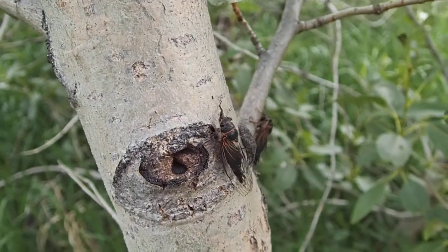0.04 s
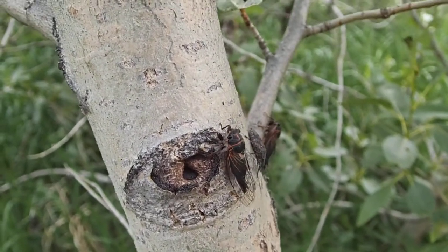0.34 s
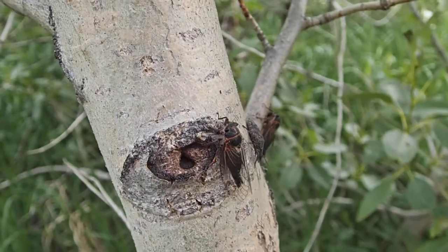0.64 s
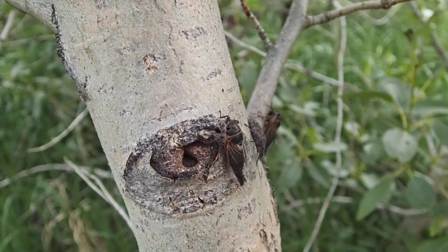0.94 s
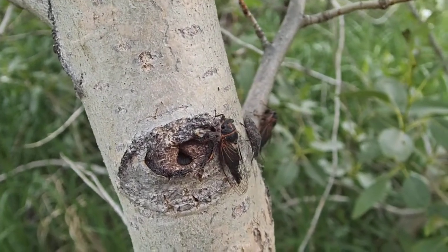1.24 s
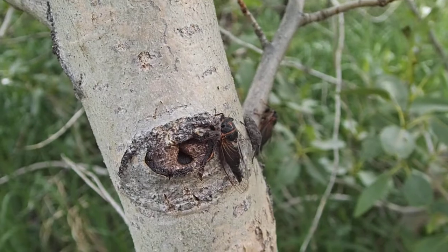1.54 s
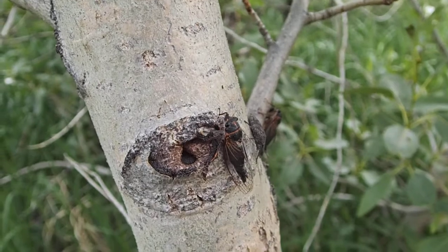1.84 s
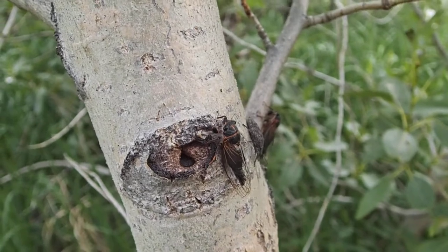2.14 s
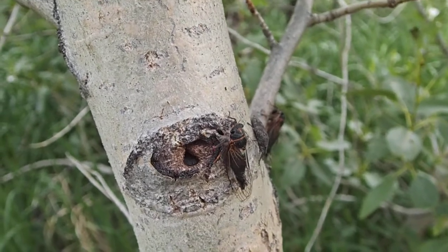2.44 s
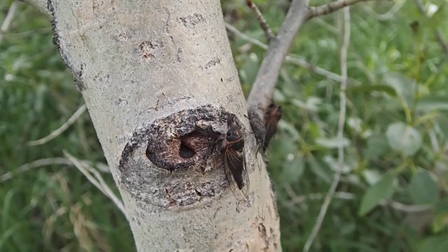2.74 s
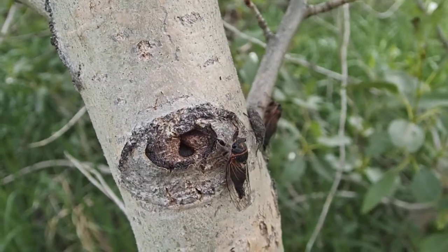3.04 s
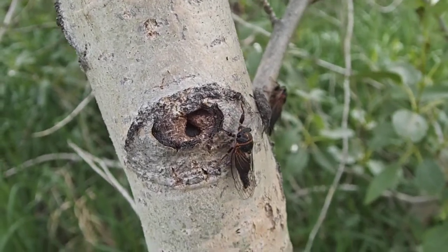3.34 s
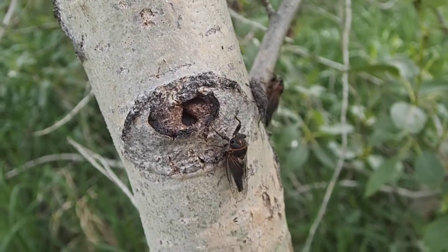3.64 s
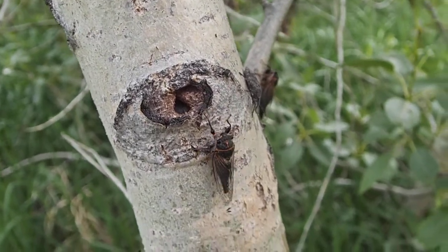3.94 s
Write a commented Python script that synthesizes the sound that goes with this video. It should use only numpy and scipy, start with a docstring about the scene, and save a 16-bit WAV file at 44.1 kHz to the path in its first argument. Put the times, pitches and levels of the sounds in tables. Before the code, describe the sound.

Sharp cicada wing clicks sound close and slightly left, growing harder, then turning to dry snaps. Other cicadas click over a faint outdoor hiss and rumble, and a camera's focus motor rattles softly until just past halfway.

```python
"""Outdoors at a tree trunk among bushes, on a camera's stereo microphone. Close up and a little right, a cicada
flicks its wings about seven times a second, each flick buckling and ringing the membrane; for a second it slaps
them hard, then snaps them dryly. Neighbours click in answer, and leaves scatter the clicks. Far off, air
rumbles softly and the colony hisses. On the right a small mechanism, probably the focus motor, chatters until
it stops with a tick. Two soft handling bumps reach the microphone."""
import sys
import numpy as np
from scipy import signal
from scipy.fft import rfft, irfft
from scipy.io import wavfile
from scipy.ndimage import map_coordinates

SR = 44100
rng = np.random.default_rng(int(sys.argv[2]) if len(sys.argv) > 2 else 0)


def int16_out(signal):
    """Quantize to a 16-bit WAV file."""
    q = np.round(np.clip(np.atleast_2d(signal).T, -1, 1) * 32767)
    wavfile.write(sys.argv[1], SR, q.astype(np.int16))


N = 176400

# spectra of the distant air and of the far cicadas' hiss: f/Hz, level/dB
AIR_SPECTRUM = [(15, -53), (30, -9), (55, -1), (160, -2), (850, -11.5), (1540, -19.5), (2500, -29),
                (8800, -39)]
HISS_SPECTRUM = [(4100, -23), (5000, 0), (7200, -3.5), (7950, 4), (8900, -6.5), (10500, -15)]
# the motor's two runs: start/s, stop/s
MOTOR_SPANS = [(.0142, 1.39), (1.3922, 2.38)]
# strokes within one motor cycle: t/s, level/dB
MOTOR_STROKES = [(0, 5), (.0058, -1.5), (0.011, -1), (0.033, 5)]
# modes of the camera body: f/Hz, level/dB, T60/s
CAMERA_MODES = [(301, -6, 0.022), (421, -7.5, 0.1), (566, -2, 0.015), (927, -10, 0.036), (1047, 1.5, 0.028),
                (1164, -2, 0.038), (1239, -13.5, 0.13), (1652, -5.5, 0.013)]
# the close cicada's wing flicks: t/s, level/dB, length/s
WING_FLICKS = [(0.019, -26, 0.0038), (0.1439, -25, 0.0043), (0.2595, -22.5, 0.0026), (0.3772, -24, 0.0038),
               (0.5252, -22.5, 0.0027), (0.798, -25.5, 0.00029), (0.9767, -26.5, 0.0013)]
# spectra of its wing's ring and crackle: f/Hz, level/dB
WING_SPECTRUM = [(2000, -30.5), (4000, -34), (4500, -11.5), (5200, -4.5), (6800, -6.5), (7850, 6),
                 (8700, -5.5), (10000, -26.5), (16000, -18.5)]
CRACKLE_SPECTRUM = [(3100, -37.5), (5200, -1), (7000, -0.5), (9000, 9.5), (9300, 5), (9540, 12.5),
                    (9900, 2.5), (11800, -8.5), (12400, -1), (12900, -3), (15500, -15)]
# neighbours' clicks from the bushes: t/s, level/dB, treble/dB
ANSWER_CLICKS = [(0.286, -40.5, -15), (0.4135, -39, 1), (0.5121, -35.5, -3), (0.566, -40.5, 1),
                 (0.633, -35.5, -1), (0.6825, -33.9, -7), (0.728, -38, 2), (0.7392, -34, 3),
                 (0.7805, -35.5, 5), (0.8305, -30, 8), (0.8529, -36, 0), (0.881, -33.0, -10.5),
                 (0.9696, -28.5, 0), (1.0003, -32.5, 7), (1.1088, -31.5, 6), (1.1382, -28.5, 7),
                 (1.2703, -30.8, 3.5), (1.4067, -28.5, 4.5), (1.4905, -33.5, -1), (1.5279, -28, 3.5),
                 (1.6475, -30.5, -3), (1.6706, -26.5, 1), (1.8029, -26.5, 6.5), (1.9432, -25.5, -0.5),
                 (2.1996, -34, 10), (2.2172, -34, -1), (2.2505, -32, 0), (2.3371, -35.5, 0),
                 (2.3575, -34, 4), (2.3762, -32, -4), (2.5023, -31, -2), (2.6199, -28.5, -0.5),
                 (2.738, -33, 5), (2.7473, -33.5, 4), (2.801, -38.4, -2.5), (2.9034, -30.5, -1)]
# spectrum of a neighbour's click, also the ring of a close snap: f/Hz, level/dB
CLICK_SPECTRUM = [(2200, -33.5), (3100, -24.5), (4100, -28), (4600, -13), (5200, -2.5), (7000, -7),
                  (8000, 0), (9000, -8.5), (10500, -23), (16000, -24.5)]
# bumps on the camera: t/s, level/dB, f/Hz
HANDLING_BUMPS = [(0.646, -40, 85), (3.23, -42.5, 105)]
# the close cicada's hard slaps: t/s, level/dB, scrape before the blow/s
WING_SLAPS = [(1.0975, -24, 0.0021), (1.236, -20, .0064), (1.365, -20.5, .0034), (1.4829, -20.5, 0.00039),
              (1.6346, -22.5, 0.00021), (1.7778, -18, .0004), (1.93, -22.5, 0.0045),
              (2.0732, -17.5, 0.00028)]
# its dry snaps: t/s, level/dB, treble/dB
WING_SNAPS = [(2.4785, -29, -16.5), (2.6028, -28, -31), (2.7326, -25, -34), (2.86, -36, 1),
              (2.8928, -26.5, -45), (3.0316, -29.5, -2), (3.0379, -28, -18), (3.1727, -29, -1.5),
              (3.3061, -26.5, -2), (3.435, -27.5, -3), (3.5713, -27.5, -1), (3.715, -25, -5.5),
              (3.8788, -28, -3.5)]
# spectra of a slap's blow and a snap's crack: f/Hz, level/dB
SLAP_SPECTRUM = [(2000, -38.5), (3200, -31), (4100, -35.5), (5200, -10.5), (6200, -7.5), (7100, -2.5),
                 (7750, 3.5), (8400, -11), (9200, -18.5), (11000, -26), (13000, -33), (16000, -32)]
SNAP_SPECTRUM = [(2000, -25), (4100, -18), (5100, 0.5), (7900, 6.5), (9800, 3.5), (16000, -20.5)]

MEMBRANE_HZ, MEMBRANE_WIDTH_HZ = 7780, 1400  # the wing's main resonance
RING_DECAY_S, CRACKLE_DECAY_S = 0.0055, 0.0034
RING_LAG_S, CRACKLE_LAG_S = 6e-6, 1.8e-5  # clicks reach the left side of the microphone later


def amp(db):
    """Decibels to amplitude."""
    return 10 ** (np.asarray(db) / 20)


def unit(x):
    """Scale to rms 1."""
    return x / np.sqrt(np.mean(x ** 2) + 1e-20)


def unit_click(x):
    """Scale a click to rms 1 over ten milliseconds."""
    return x / np.sqrt(np.sum(x ** 2) / (SR / 100) + 1e-20)


def gain_at(spectrum, hz):
    """A spectrum's amplitude at hz, interpolated on log axes."""
    f, db = np.transpose(spectrum)
    return amp(np.interp(np.log(hz + 1), np.log(f + 1), db))


def shelved(spectrum, db, above_hz):
    """A spectrum with its upper part shifted by db."""
    return [(hz, level + db * (hz > above_hz)) for hz, level in spectrum]


def pan(db):
    """Left and right gains; negative db favours the right."""
    return amp(np.array([[db], [-db]]) / 2)


def add(out, s, x):
    """Mix x into out from time s."""
    i = max(0, round(s * SR))
    part = out[..., i:i + x.shape[-1]]
    part += x[..., :part.shape[-1]]


def wobble(per_s, size=N):
    """A curve gliding between random values, per_s of them a second."""
    return map_coordinates(rng.standard_normal(4096), [np.arange(size) * per_s / SR], order=1)


def stereo_noise(spectrum, correlation):
    """Coloured noise of rms 1, partly alike in the two channels."""
    gain = gain_at(spectrum, np.fft.rfftfreq(N, 1 / SR))
    angle = np.arccos(correlation) / 2
    mid, side = irfft(rfft(rng.standard_normal((2, N))) * gain * [[np.cos(angle)], [np.sin(angle)]], N)
    return unit(np.array([mid + side, mid - side]))


def distance():
    """Distant air rumbles and far cicadas blur into a hiss; both waver in level."""
    air = amp(-51.5 + 0.54 * wobble(7.58)) * stereo_noise(AIR_SPECTRUM, correlation=0.26)
    hiss = amp(-51 + 4 * wobble(24.87)) * stereo_noise(HISS_SPECTRUM, correlation=0.46)
    return pan(-0.5) * air + pan(-2) * hiss


def motor(cycle_hz=14.985, stroke_db=-40.5, whirr_db=-55.5, tick_s=2.3985, tick_hz=1215):
    """Hard right, strokes knock the camera body over a faint whirr; a last tick parks the mechanism."""
    out, t = np.zeros(N), np.arange(SR // 8) / SR
    attack = 1 - np.exp(-t / 0.00099)
    for start, stop in MOTOR_SPANS:
        for cycle in np.arange(start, stop, 1 / cycle_hz):
            for s, db in MOTOR_STROKES:
                knock = sum(amp(level + rng.normal(0, 1) - 60 * t / t60)
                            * np.sin(2 * np.pi * hz * t + rng.normal(0, 0.69))
                            for hz, level, t60 in CAMERA_MODES)
                onset = cycle + s + rng.normal(0, 0.00043)
                add(out, onset, amp(stroke_db + db + rng.normal(0, 1)) * knock * attack)
    body = sum(amp(level - 60 * t / t60) * np.sin(2 * np.pi * hz * t) for hz, level, t60 in CAMERA_MODES)
    drive = rng.standard_normal(int(MOTOR_SPANS[-1][1] * SR))
    add(out, 0, amp(whirr_db) * unit(signal.fftconvolve(drive, body)))
    age = t / 0.00098  # the tick peaks after about 2 ms
    tick = (age / 2) ** 2 * np.exp(2 - age) * np.sin(2 * np.pi * tick_hz * t)
    add(out, tick_s, amp(-28.5) * tick)
    return out * amp([[-34], [0]])


def struck(spectrum, size=2048):
    """Minimum-phase frequency response: a body rings only after it is struck."""
    cepstrum = irfft(np.log(gain_at(spectrum, np.fft.rfftfreq(size, 1 / SR))))
    cepstrum[1:size // 2] *= 2
    cepstrum[size // 2 + 1:] = 0
    return np.exp(rfft(cepstrum))


def membrane(spectrum, size=2048):
    """A wing's frequency response with the membrane's resonance on top."""
    hz = np.fft.rfftfreq(size, 1 / SR)
    damping = 1j * hz * MEMBRANE_WIDTH_HZ
    return struck(spectrum) * (1 + 0.75 * damping / (MEMBRANE_HZ ** 2 - hz ** 2 + damping))


def buckle(response, hold_s, decay_s, lag_s=RING_LAG_S, size=2048):
    """A wing buckles: a first crack and a short run of uneven ones ring its membrane."""
    t, sides = np.arange(size) / SR, np.array([[1], [-1]])
    envelope = (1 - np.exp(-t / 0.0001)) * np.exp(-np.maximum(t - hold_s, 0) / decay_s)
    cracks = rng.standard_normal((2, size)) * envelope * amp(2 * wobble(2350, size))
    cracks[0, 0] = amp(-16.5) * np.linalg.norm(cracks[0])  # the first crack, against all the rest
    mid, side = irfft(rfft(cracks) * response)
    pair = unit_click(mid) + 0.34 * unit_click(side) * sides
    delay = np.exp(-1j * np.pi * np.fft.rfftfreq(2 * size, 1 / SR) * lag_s * sides)
    return irfft(rfft(pair, 2 * size) * delay)[:, :size]


def flicks(full_length_s=0.0043):
    """Close on the trunk, each wing flick rings and crackles, the shorter ones less."""
    out, wing, crackling = np.zeros((2, N)), membrane(WING_SPECTRUM), struck(CRACKLE_SPECTRUM)
    for s, db, length in WING_FLICKS:
        fullness = length / full_length_s
        ring = buckle(wing, 0.24 * length, RING_DECAY_S * min(1, fullness))
        crackle = buckle(crackling, 0.5 * length, CRACKLE_DECAY_S, CRACKLE_LAG_S)
        add(out, s, pan(-3.5) * (amp(db) * ring + amp(-34) * fullness * crackle))
    return out


def foliage(clicks, t60_s=0.13, pieces=12):
    """Leaves and twigs scatter each click into a short tail."""
    out, t = np.zeros((2, N)), np.arange(SR // 3) / SR
    envelope = amp(-60 * t / t60_s) * (1 - np.exp(-t / 0.0043))
    for k, piece in enumerate(np.array_split(clicks, pieces, axis=1)):
        tail = rng.standard_normal((2, len(t))) * envelope
        add(out, k * N / pieces / SR, signal.fftconvolve(piece, tail / np.linalg.norm(tail[0]), axes=1))
    return out


def neighbours(colony_per_s=26):
    """Wings answer from the bushes over the colony's faint random clicks, some dull, some bright."""
    out = np.zeros((2, N))
    colony = [(rng.uniform(0, N / SR), rng.normal(-51, 3.5), rng.uniform(-13.5, 7.2))
              for _ in range(int(colony_per_s * N / SR))]
    for s, db, treble_db in [*ANSWER_CLICKS, *colony]:
        wing = membrane(shelved(CLICK_SPECTRUM, treble_db, above_hz=7500))
        place = pan(rng.normal(-2.5, 1))
        add(out, s, place * amp(db) * buckle(wing, hold_s=0.00054, decay_s=0.0045))
    return out


def handling(rise_s=0.0037):
    """Soft bumps on the camera reach the microphone as short, dull thuds."""
    out, t = np.zeros(N), np.arange(SR // 8) / SR
    envelope = t / rise_s * np.exp(1 - t / rise_s)
    for s, db, hz in HANDLING_BUMPS:
        add(out, s, amp(db) * envelope * np.sin(2 * np.pi * hz * t))
    return out


def slaps():
    """Close up, a hard slap: a scrape, one sharp blow and a soft rattle as the wing settles."""
    out, wing = np.zeros((2, N)), membrane(WING_SPECTRUM)
    blow = unit_click(irfft(struck(SLAP_SPECTRUM)))
    for s, db, scrape_s in WING_SLAPS:
        scrape = buckle(wing, hold_s=scrape_s, decay_s=0.0014)
        rattle = buckle(wing, hold_s=0.0023, decay_s=RING_DECAY_S)
        add(out, s - scrape_s, amp(-31) * scrape)
        add(out, s, amp(db + 0.5) * blow)
        add(out, s + 0.0017, amp(db - 8) * rattle)
    return pan(-2) * out


def snaps(hold_s=0.00093):
    """Close up, a dry snap: one sharp crack, then the wing rings and fizzes."""
    out = np.zeros((2, N))
    for s, db, treble_db in WING_SNAPS:
        crack = unit_click(irfft(struck(shelved(SNAP_SPECTRUM, treble_db, above_hz=8800))))
        ring = buckle(membrane(CLICK_SPECTRUM), hold_s, RING_DECAY_S)
        fizz = buckle(struck(CRACKLE_SPECTRUM), hold_s, CRACKLE_DECAY_S, CRACKLE_LAG_S)
        add(out, s, amp(db) * (amp(-7) * crack + amp(-2) * ring + amp(treble_db + 4.5) * fizz))
    return pan(-2) * out


def scene():
    """At the microphone: trunk, bushes, the camera's own noises and the distance."""
    close = flicks() + slaps() + snaps()
    bushes = neighbours()
    tails = amp(-7.5) * foliage(amp(-9) * close + bushes)  # the close cicada sounds drier
    return close + bushes + tails + motor() + handling() + distance()


def record(dry, top_hz=16100):
    """The camera cuts off steeply above its band limit."""
    hz = np.fft.rfftfreq(2 * N, 1 / SR)
    low_pass = 1 / (1 + (hz / top_hz) ** 100)
    return irfft(rfft(dry, 2 * N) * low_pass)[:, :N]


dry = scene()
out = record(dry)
int16_out(out)
```